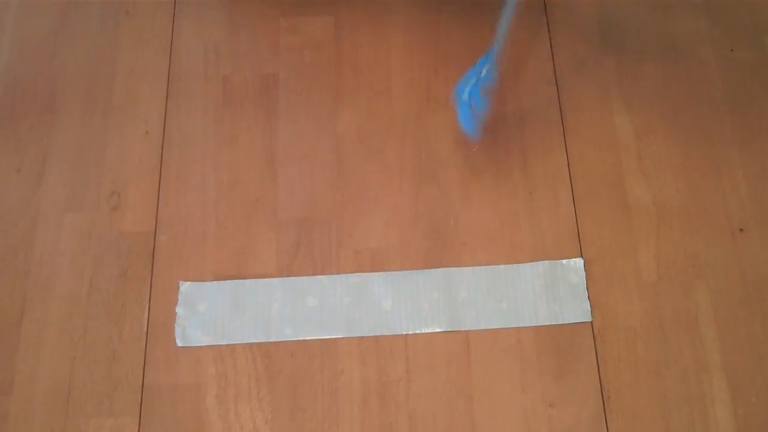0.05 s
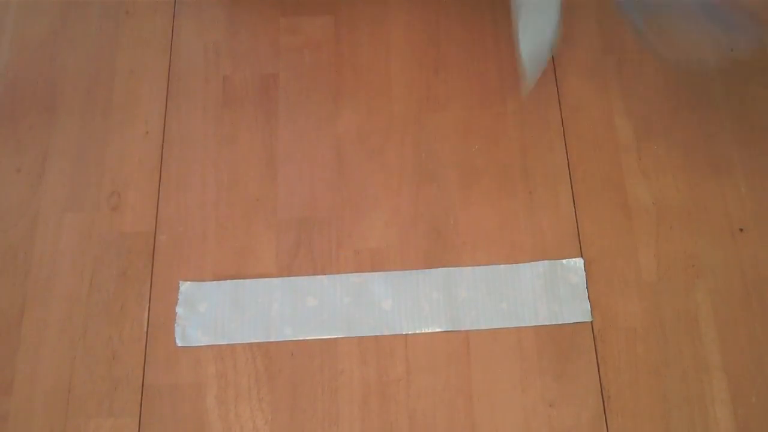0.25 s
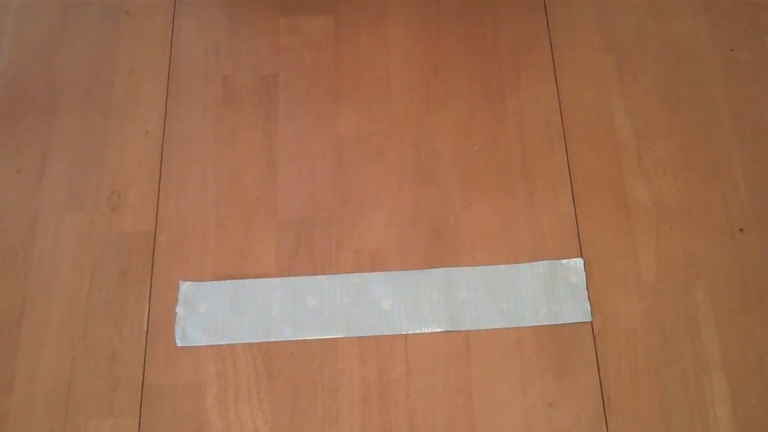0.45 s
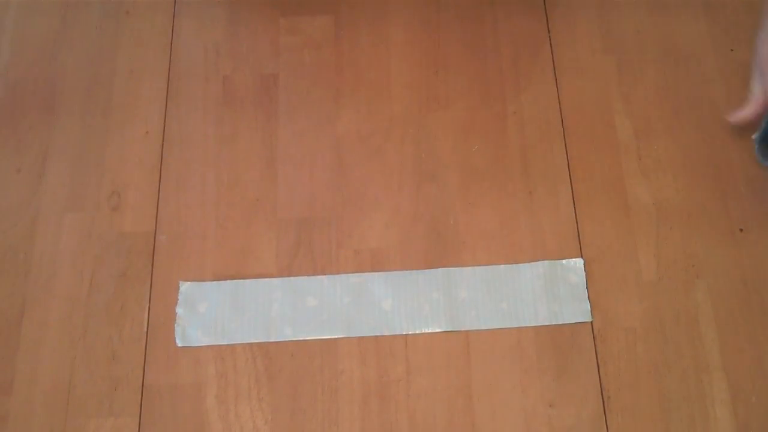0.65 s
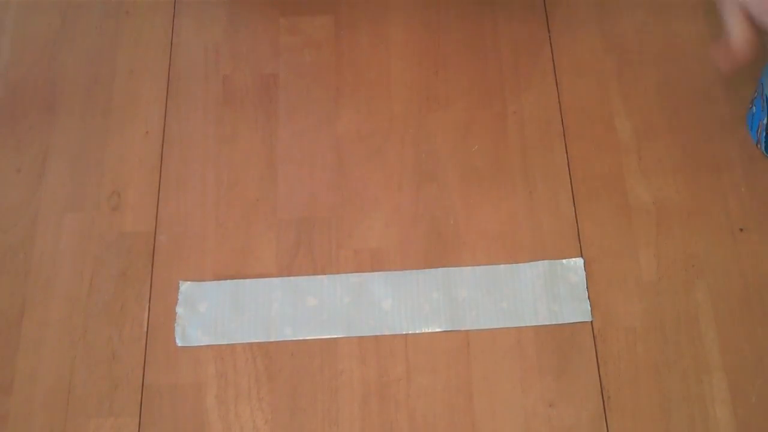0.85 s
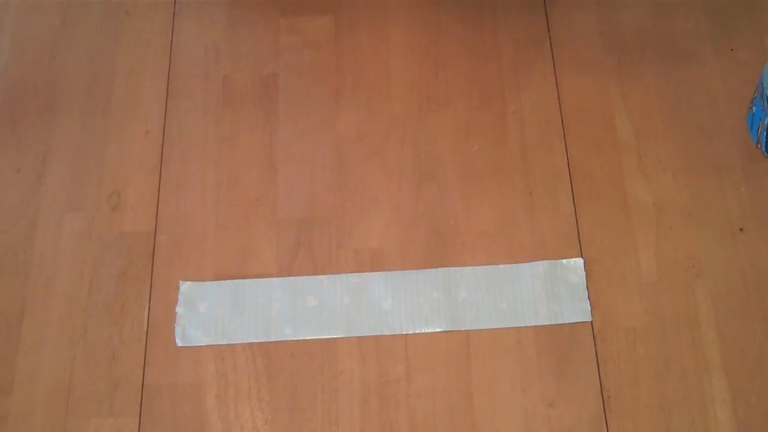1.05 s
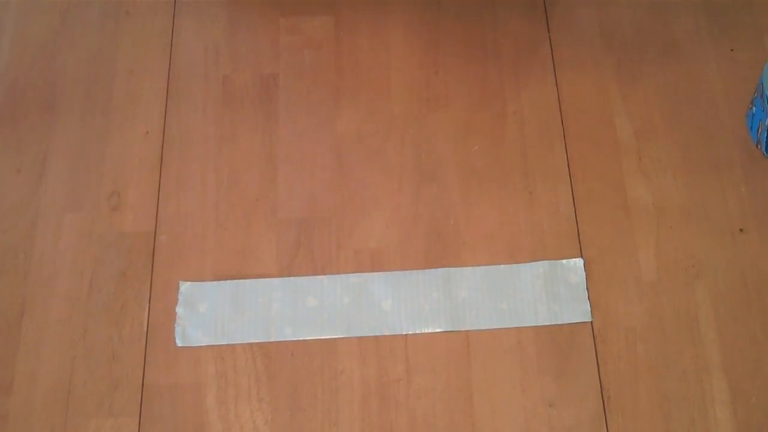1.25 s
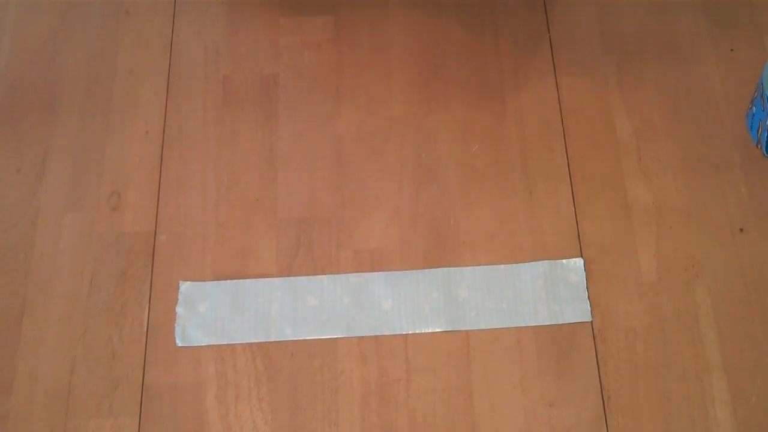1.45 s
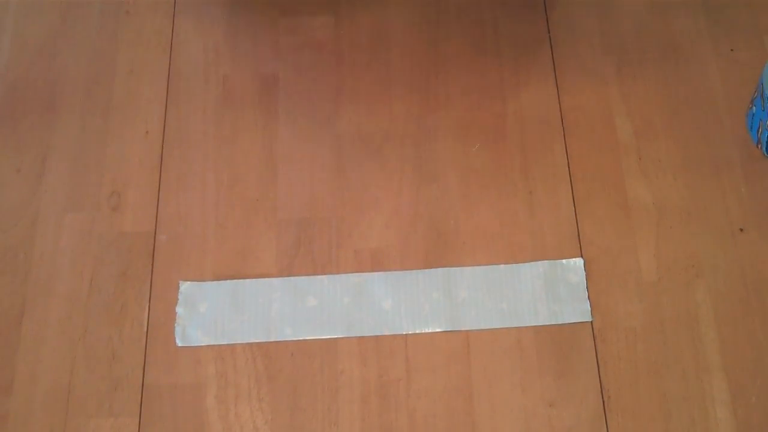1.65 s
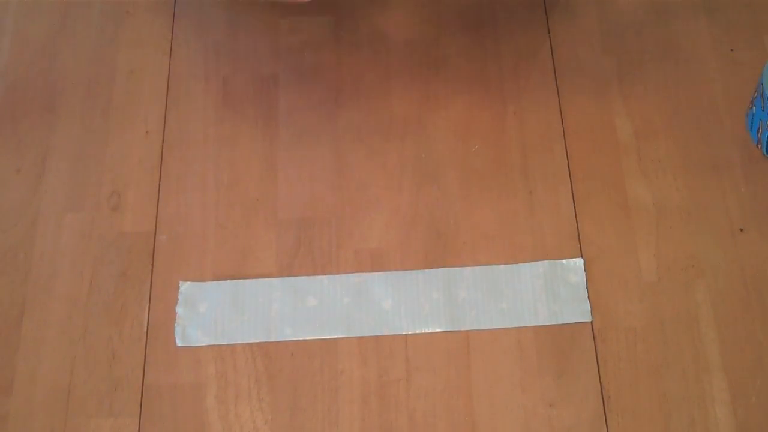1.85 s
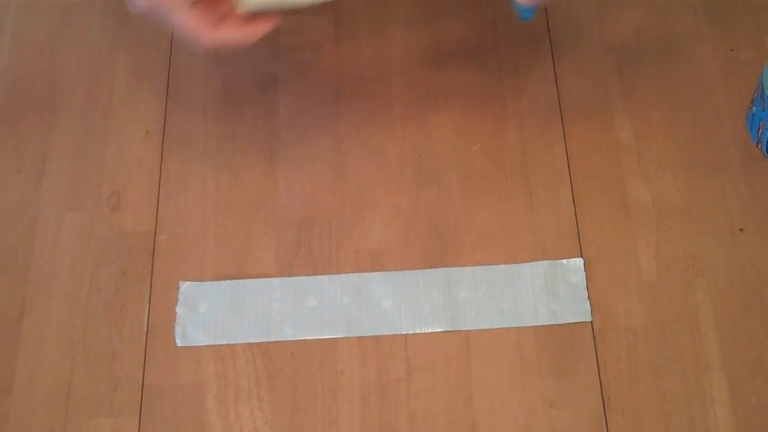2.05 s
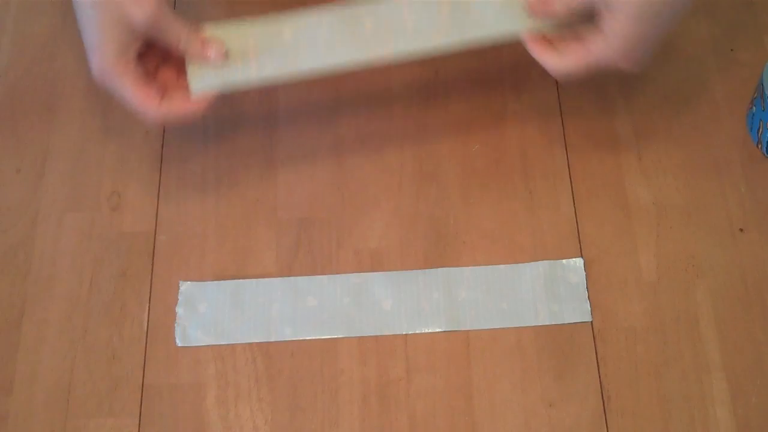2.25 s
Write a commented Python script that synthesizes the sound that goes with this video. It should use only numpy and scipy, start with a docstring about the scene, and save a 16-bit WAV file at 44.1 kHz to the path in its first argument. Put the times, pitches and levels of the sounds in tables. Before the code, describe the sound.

Duct tape is torn by hand: dry crackles from 0.05 s thicken into a fast, bright rip at 0.2-0.29 s. Sticky crinkles follow at 0.43-0.58 s, soft bumps at 0.62 s, then the roll cracks down and rocks hollowly on wood at 0.76-0.85 s. Faint metal tinks and small crinkles follow; from 1.93 s the strip rustles with a faint rising finger swish. Quiet room air, close microphone.

```python
"""In a room with a wooden floor, duct tape is torn across: its edge crackles, then threads snap in a quick run.
Soft bumps come before the roll lands with a hollow clatter; bits of metal tink and the torn strip rustles.
Snaps, crinkles and rustle are coloured clicks; the roll is noise and ringing tones; the metal is fading tones.
A finger slide is narrow noise that rises in pitch. Room air, faint hum and a low flutter lie underneath."""
import sys
import numpy as np
from scipy import signal
from scipy.fft import rfft, irfft
from scipy.io import wavfile
from scipy.ndimage import uniform_filter1d, minimum_filter1d

SR = 44100
rng = np.random.default_rng(int(sys.argv[2]) if len(sys.argv) > 2 else 0)


def unload_audio(sound):
    """Save the sound as a 16-bit wav file, at the path given as the first command line argument."""
    columns = np.transpose(np.atleast_2d(sound))
    # keep every value between -1 and 1, then stretch to whole-number steps
    steps = np.round(np.clip(columns, -1, 1) * 32767)
    wavfile.write(sys.argv[1], SR, steps.astype(np.int16))


N = 101429
T = np.arange(N) / SR  # time in seconds


def amp(db):
    """Decibels to gain."""
    return 10 ** (np.asarray(db) / 20)


def unit(x):
    """Scale to rms 1."""
    return x / np.sqrt(np.mean(x ** 2))


def unit_energy(x):
    """Scale so that the squares sum to 1."""
    return x / np.sqrt(np.sum(x ** 2))


def conv(x, h):
    """Pass x through the response h."""
    return signal.fftconvolve(x, h)[:len(x)]


def add(out, s, x):
    """Mix x into out at time s."""
    i = max(int(s * SR), 0)
    out[i:i + len(x)] += x[:max(len(out) - i, 0)]


def fade(t60, t=T):
    """A decay that falls by 60 dB in t60 seconds."""
    return np.exp(-np.log(1000) * t / t60)


def low_pass(x, hz):
    """Gently remove what lies above hz."""
    return signal.sosfilt(signal.butter(2, hz, fs=SR, output="sos"), x)


def high_pass(x, hz, order):
    """Remove what lies below hz, more steeply with a higher order."""
    return signal.sosfilt(signal.butter(order, hz, "high", fs=SR, output="sos"), x)


def on_log(hz, points):
    """Read (Hz, value) points on a log-frequency axis."""
    f, v = np.array(points).T
    return np.interp(np.log(hz + 1), np.log(f), v)


def colour(points, size=4096):
    """Minimum-phase response of unit energy: the given spectrum, starting as promptly as it can."""
    hz = np.arange(size // 2 + 1) * SR / size
    cepstrum = irfft(np.log(amp(on_log(hz, points))))
    # fold the later half onto the earlier one, so nothing sounds before the blow
    cepstrum[1:size // 2] *= 2
    cepstrum[size // 2 + 1:] = 0
    return unit_energy(irfft(np.exp(rfft(cepstrum))))


# How long the room rings on.
# Each row: frequency in Hz, time to fall by 60 dB in seconds.
ROOM_DECAY = [(150, 0.56), (500, 0.42), (1400, 0.38), (3000, 0.31), (7000, 0.23), (14000, 0.19)]
ROOM_BUILD_S = 0.002


def room(x, wet_db, count=10, size=32768):
    """Add a diffuse tail: bands of noise that die sooner in the treble."""
    noise, tail, t = rfft(rng.standard_normal(size)), 0, T[:size]
    centres = np.geomspace(100, 15000, count)
    hz_of_bin = np.arange(len(noise)) * SR / size
    place = np.interp(np.log(hz_of_bin + 1), np.log(centres), np.arange(count))
    for k, hz in enumerate(centres):
        band = irfft(noise * np.maximum(1 - abs(place - k), 0))  # overlapping triangles
        tail = tail + band * fade(on_log(hz, ROOM_DECAY), t)
    tail *= 1 - np.exp(-t / ROOM_BUILD_S)
    return x + amp(wet_db) * conv(x, unit_energy(tail))


GRAIN_DB = 3  # how unequal the clicks are


def grains():
    """Dense tiny clicks of very unequal size."""
    clicks = rng.standard_normal(N) * (rng.random(N) < .2)
    size_db = GRAIN_DB * np.minimum(rng.exponential(size=N), 4)
    return unit(clicks * amp(size_db))


SHEET_LOW_HZ = 376


def thin(x):
    """Take out the bass: the light strip radiates little of it."""
    return high_pass(x, SHEET_LOW_HZ, 2)


# Spectrum of the quiet room air.
# Each row: frequency in Hz, level in dB per Hz.
AIR_SPECTRUM = [(25, 7), (50, -5), (100, -9), (200, -8), (300, -7), (430, -2), (620, -5.5), (900, -8.5),
                (1600, -9.5), (2400, -22), (3600, -23.5), (12000, -27.5), (14000, -48)]
AIR_DB = -67


def air():
    """Quiet room air: steady coloured noise."""
    return amp(AIR_DB) * unit(conv(rng.standard_normal(N), colour(AIR_SPECTRUM)))


# Stretches of faint low flutter.
# Each row: start in seconds, end in seconds, level of each step in dB.
FLUTTER_SPANS = [(0.01, .11, -47), (.655, 1.07, -50.5)]
FLUTTER_HZ, STEP_DECAY_S = 29.6, 0.083


def flutter():
    """A faint low flutter: evenly spaced small steps that sink back, with the treble removed."""
    steps = np.zeros(N)
    for start, end, db in FLUTTER_SPANS:
        for s in np.arange(start, end, 1 / FLUTTER_HZ):
            add(steps, s, amp(db) * np.exp(-T / STEP_DECAY_S))
    return low_pass(steps, 220)


# Tones of the faint room hum.
# Each row: frequency in Hz, level in dB.
HUM_TONES = [(182, -84.5), (362, -80.5), (416, -78), (887, -76.5)]
HUM_WIDTH_HZ = 4


def hum():
    """A few faint tones that waver, because each is a very narrow band of noise."""
    out, bin_hz = 0, np.arange(N // 2 + 1) * SR / N
    for hz, db in HUM_TONES:
        line = np.exp(-((bin_hz - hz) / HUM_WIDTH_HZ) ** 2)
        out = out + amp(db) * unit(irfft(rfft(rng.standard_normal(N)) * line, N))
    return out


DRIFT_S, DRIFT_DB, DRIFT_RISE_S, DRIFT_DECAY_S = .258, -25.5, 0.0089, 0.1


def drift():
    """A slow, inaudible drift of the signal level, from late in the tear on: it dips and creeps back."""
    out = np.zeros(N)
    add(out, DRIFT_S, -amp(DRIFT_DB) * np.exp(-T / DRIFT_DECAY_S) * (1 - np.exp(-T / DRIFT_RISE_S)))
    return out


# Soft bumps on the floor boards.
# Each row: start in seconds, level in dB.
SOFT_BUMPS = [(.6222, -32), (.637, -42), (.654, -37)]
# Colour of the boards.
# Each row: frequency in Hz, level in dB per Hz.
BOARD_SPECTRUM = [(80, -26), (150, -8), (260, -6.5), (370, 1), (520, -2.5), (680, -0.5), (900, -12.5),
                  (1500, -18.5), (2500, -32), (6000, -40), (14000, -47)]
BUMP_T60_S = 0.038


def bumps():
    """Dull, padded bumps just before the roll lands: short noise coloured by the boards."""
    push = np.zeros(N)
    for s, db in SOFT_BUMPS:
        add(push, s, amp(db) * rng.standard_normal(N) * fade(BUMP_T60_S))
    return room(conv(push, colour(BOARD_SPECTRUM)), -3)


# Touches of a small piece of metal.
# Each row: start in seconds, then the level in dB given to each of the five modes below.
METAL_TOUCHES = [(0.032, -62, -70, -88, -76, -64.5), (1.003, -78, -102, -51.5, -90, -90),
                 (1.024, -60.5, -90, -90, -74, -66.5), (1.076, -62.5, -68, -95, -71, -64.5),
                 (1.476, -61.5, -63, -90, -72, -62.5), (1.51, -74.5, -66, -79, -80, -70),
                 (1.529, -90, -84, -87, -77, -69), (1.95, -60.5, -77, -95, -82, -68)]
# Pitches of the five modes. Each entry: frequency in Hz.
METAL_MODES_HZ = [2955, 5515, 5728, 10440, 11650]
# Ringing of the same five modes. Each entry: time to fall by 60 dB in seconds.
METAL_RING_S = [0.78, 0.19, 0.23, 0.14, 0.16]


def metal():
    """Thin, clear tinks of a small piece of metal; each touch feeds the same ringing modes."""
    out = 0
    for k, (hz, t60) in enumerate(zip(METAL_MODES_HZ, METAL_RING_S)):
        strength = np.zeros(N)
        for s, *mode_dbs in METAL_TOUCHES:
            add(strength, s, amp(mode_dbs[k]) * fade(t60))
        out = out + strength * np.sin(2 * np.pi * hz * T)
    return room(out, -16)


# Knocks of the roll as it lands and rocks.
# Each row: start in seconds, level in dB, cut-off in Hz (lower for a softer contact).
ROLL_KNOCKS = [(.7555, -24.5, 3240), (.764, -24.5, 2180), (.773, -30.5, 2380), (.8125, -36.5, 2110),
               (.8215, -25.5, 1190), (.847, -28.5, 1100)]
# Ringing tones of the roll.
# Each row: frequency in Hz, level in dB.
ROLL_TONES = [(268, -12), (350, -9), (420, -12), (615, -1), (668, 2), (721, 0), (824, -3), (865, -5),
              (1015, -4), (1105, 0), (1248, -4), (1347, 1), (1506, -5), (1767, -6)]
# Colour of the noisy thud of the roll.
# Each row: frequency in Hz, level in dB per Hz.
ROLL_BODY_SPECTRUM = [(150, -17), (270, -6.5), (500, -7.5), (700, -0.5), (1300, 1), (2100, -5.5),
                      (3000, -15), (5000, -33), (7000, -18), (14000, -25)]
ROLL_T60_S, BODY_T60_S = 0.22, 0.062
RING_DB, ROLL_ROOM_DB = -13, -2.5


def knocks():
    """Hollow clatter: noise plus ringing modes; harder contacts let more treble through."""
    out = np.zeros(N)
    ring = sum(amp(db) * np.sin(2 * np.pi * hz * T) for hz, db in ROLL_TONES) * fade(ROLL_T60_S)
    for s, db, cutoff_hz in ROLL_KNOCKS:
        noise = rng.standard_normal(N) * fade(BODY_T60_S)
        blow = conv(noise, colour(ROLL_BODY_SPECTRUM)) + amp(RING_DB) * ring / 2
        add(out, s, amp(db) * low_pass(blow, cutoff_hz))
    return room(out, ROLL_ROOM_DB)


# Crack of the hard rim.
# Each row: frequency in Hz, level in dB per Hz.
RIM_SPECTRUM = [(150, -20), (600, -2), (1500, -0.5), (3000, -0.5), (5000, -4.5), (5900, -35), (7500, -19),
                (9000, -31), (14000, -24.5)]
RIM_S, RIM_DB = .7557, -8.5


def rim():
    """The hard rim cracks once as it lands: a single coloured click."""
    out = np.zeros(N)
    add(out, RIM_S, -amp(RIM_DB) * colour(RIM_SPECTRUM))
    return room(out, -10.5)


ROLL_LOW_HZ = 208


def roll():
    """The roll drops on its rim and rocks, with little bass."""
    return high_pass(knocks() + rim(), ROLL_LOW_HZ, 3)


# Fingers sliding along the strip, its resonance rising.
# Each row: time in seconds, frequency in Hz, level in dB.
SLIDE_PATH = [(1.93, 2090, -85), (1.969, 2200, -61.5), (2.001, 2550, -77), (2.058, 2638, -67),
              (2.125, 3113, -58.5), (2.17, 3287, -68), (2.255, 3530, -69), (2.3, 3700, -70)]
SLIDE_WIDTH_HZ = 250  # to each side of the centre
SLIDE_OVERTONE, SLIDE_OVERTONE_DB = 2.2, -8  # times the frequency, level


def slide():
    """A narrow, rising swish of fingers on the taut strip: slow noise carried up to a gliding pitch."""
    at, hz, db = np.array(SLIDE_PATH).T
    phase = 2 * np.pi * np.cumsum(np.interp(T, at, hz)) / SR
    a, b, c, d = unit(low_pass(rng.standard_normal((4, N)), SLIDE_WIDTH_HZ))
    lower = a * np.cos(phase) + b * np.sin(phase)
    upper = c * np.cos(SLIDE_OVERTONE * phase) + d * np.sin(SLIDE_OVERTONE * phase)
    swish = lower + amp(SLIDE_OVERTONE_DB) * upper
    return room(swish * amp(np.interp(T, at, db)) * (T > at[0]), -12)


# Handling of the strip.
# Each row: time in seconds, level in dB.
HANDLING_LEVEL = [(.05, -73.5), (.1, -58.5), (.2, -58), (.42, -59.5), (.512, -60.5), (.527, -51.5),
                  (.58, -50.5), (.62, -85), (.78, -67), (.855, -56), (.89, -71.5), (1.45, -73), (1.6, -65),
                  (1.68, -72.5), (1.92, -74), (1.97, -61.5), (2.05, -60.5), (2.12, -57.5), (2.18, -59.5),
                  (2.25, -56.5), (2.3, -62.5)]
# Colour of the rustle.
# Each row: frequency in Hz, level in dB per Hz.
RUSTLE_SPECTRUM = [(150, -16), (600, -17.5), (1200, -9), (2200, -1), (3300, -1), (4500, -6.5), (7500, -6.5),
                   (10500, -11.5), (14000, -15)]


def rustle():
    """The loose strip rustles: dense clicks that swell and sink with the handling."""
    level = amp(np.interp(T, *np.array(HANDLING_LEVEL).T))
    return conv(grains() * level, colour(RUSTLE_SPECTRUM))


# Sticky crinkles that build up and let go.
# Each row: release in seconds, level in dB, build-up in seconds.
STICKY_CRINKLES = [(0.436, -50, 0.0052), (.4685, -49, .002), (0.502, -41.5, .002), (.5365, -38.5, 0.0049),
                   (0.574, -34.5, 0.0056), (1.3128, -55.5, 0.0016), (1.325, -64, .002),
                   (1.589, -63, 0.0046), (1.603, -45, 0.0025), (1.613, -56, 0.0024), (1.823, -52, 0.0011),
                   (1.843, -60, 0.0034), (1.932, -51.5, .001), (1.9928, -40.5, 0.0012),
                   (2.0035, -43, 0.0013)]
# Colour of the crinkles.
# Each row: frequency in Hz, level in dB per Hz.
CRINKLE_SPECTRUM = [(200, -6), (700, -3.5), (1500, -0.5), (3200, 5.5), (5000, 0), (7500, 0.5),
                    (11000, -7.5), (14000, -9)]
RELEASE_DECAY_S = 0.00095


def crinkles():
    """Glue crinkles off the fingers: bursts of clicks that grow up to the release, then die."""
    swell = np.zeros(N)
    for s, db, build_s in STICKY_CRINKLES:
        swell += amp(db) * np.exp(-np.maximum((s - T) / build_s, (T - s) / RELEASE_DECAY_S))
    return conv(grains() * swell, colour(CRINKLE_SPECTRUM))


RUSTLE_ROOM_DB, CRINKLE_ROOM_DB = -5, -6.5


def strip():
    """The loose strip in the room: its rustle and its sticky crinkles, without bass."""
    dry_rustle = rustle()
    return thin(room(crinkles(), CRINKLE_ROOM_DB) + room(dry_rustle, RUSTLE_ROOM_DB))


def snap(fray_s, fray_db, size=256):
    """One thread breaks: a click and a brief fraying; unit energy."""
    x = amp(fray_db) * rng.standard_normal(size) * np.exp(-T[:size] / fray_s)
    x[0] = 1
    return unit_energy(x)


# Colour of a breaking thread, for the lone snaps and the run.
# Each row: frequency in Hz, level in dB per Hz.
THREAD_SPECTRUM = [(100, -31), (500, -15.5), (1100, -4.5), (2000, -1), (3300, 1), (5500, -0.5), (8000, -1),
                   (11000, -6), (14000, -11)]
# Threads and glue letting go one by one. Each row: start in seconds, level of the snap in dB, level of # its
# echo off the floor in dB.
LONE_SNAPS = [(0.0548, -29.5, -44), (0.0901, -26, -27.5), (.098, -25, -24), (.1065, -37, -48),
              (0.119, -23.5, -26), (0.124, -24, -22.5), (0.1508, -44, -25), (.1663, -49, -25.5),
              (0.1799, -24, -19), (0.189, -48, -21.5), (0.2082, -20, -32), (0.212, -15, -25),
              (0.2189, -13, -11.5), (0.2248, -15, -24), (0.2277, -16.5, -10), (0.2329, -12.5, -10),
              (0.2834, -13, -2.5)]
# Colour of the echo off the floor. Each row: frequency in Hz, level in dB per Hz.
ECHO_SPECTRUM = [(200, -27), (1000, -12), (2200, -11), (3300, 6), (4600, -10.5), (6500, -2), (9000, -19),
                 (14000, -9.5)]
SNAP_DECAY_S, ECHO_DECAY_S, FRAY_DB = 0.0011, 0.00056, 0
ECHO_LAG_S = 0.00164


def lone_snaps():
    """Threads snap one by one, each followed 1.64 ms later by its echo off the floor."""
    out = np.zeros(N)
    for s, db, echo_db in LONE_SNAPS:
        thread = signal.fftconvolve(snap(SNAP_DECAY_S, FRAY_DB), colour(THREAD_SPECTRUM))
        echo = signal.fftconvolve(snap(ECHO_DECAY_S, FRAY_DB), colour(ECHO_SPECTRUM))
        add(out, s, amp(db) * thread)
        add(out, s + ECHO_LAG_S, amp(echo_db) * echo)
    return out


# The running tear.
# Each row: time in seconds, threads per second, level in dB, level of the sheet's low flap in dB.
TEAR_RUN = [(0.2387, 320, -28.5, -42), (.246, 420, -27, -31.5), (0.259, 420, -21, -30.5),
            (.27, 430, -20, -23.5), (0.279, 480, -24.5, -38), (0.286, 480, -18.5, -40)]
# Colour of the flapping sheet.
# Each row: frequency in Hz, level in dB per Hz.
FLAP_SPECTRUM = [(20, -17), (60, -1.5), (100, 1.5), (160, -6.5), (300, -3), (560, 3), (820, 0), (1200, 0),
                 (3000, -1.5), (9000, -28.5)]
RUN_FRAY_S, RUN_FRAY_DB = .0005, -6
JITTER, SCATTER_DB = .08, 1.5  # uneven timing as a share of the gap, uneven loudness
FIBRE_DB = -6.5  # ripping film under the threads


def running_tear(count=60):
    """A quickening run of threads over ripping film; returns the rip and the sheet's low flap."""
    at, rate, db, flap_db = np.array(TEAR_RUN).T
    run, s = np.zeros(N), at[0]
    for early, strong in rng.standard_normal((count, 2)):
        period = 1 / np.interp(s, at, rate)
        thread = snap(RUN_FRAY_S, RUN_FRAY_DB)
        if s < at[-1]:
            # a wider gap gets a stronger snap, so the level does not depend on the rate
            add(run, s, thread * np.sqrt(period * SR) * amp(SCATTER_DB * strong - 1.5))
        s += period * (1 + JITTER * early)
    run += amp(FIBRE_DB) * grains() * (T > at[0]) * (T < at[-1])
    rip = conv(run * amp(np.interp(T, at, db)), colour(THREAD_SPECTRUM))
    flap = conv(run * amp(np.interp(T, at, flap_db)), colour(FLAP_SPECTRUM))
    return rip, flap


TAPE_ROOM_DB = -8


def tear():
    """Lone snaps, then the running tear; each snap echoes off the floor, and the sheet flaps."""
    snaps = lone_snaps()
    rip, flap = running_tear()
    return thin(room(snaps + rip, TAPE_ROOM_DB)) + flap


def scene():
    """All sources at one microphone."""
    tape = tear() + strip() + slide()
    landing = bumps() + roll() + metal()
    background = flutter() + air() + hum() + drift()
    return (tape + landing + background)[None]


LIMIT_DB, HOLD_S, RECOVER_DB_PER_S = -26.5, 0.26, 13
TOP_HZ = 14000


def record(dry):
    """The camera turns down on loud sound, holds, recovers slowly, and cuts the top."""
    power = np.abs(uniform_filter1d(dry[0] ** 2, size=700))
    level_db = 10 * np.log10(power + 1e-12)
    room_left_db = np.minimum(LIMIT_DB - level_db, 0)  # negative where too loud
    half = int(HOLD_S * SR / 2)
    # the origin makes the window look back only
    held_db = -minimum_filter1d(room_left_db, 2 * half + 1, origin=half, mode="constant")
    recovery_db = RECOVER_DB_PER_S * T
    cut_db = np.maximum.accumulate(held_db + recovery_db) - recovery_db
    top_cut = signal.ellip(10, .2, 80, TOP_HZ, fs=SR, output="sos")
    return signal.sosfilt(top_cut, dry * amp(-cut_db))


dry = scene()
out = record(dry)
unload_audio(out)
```